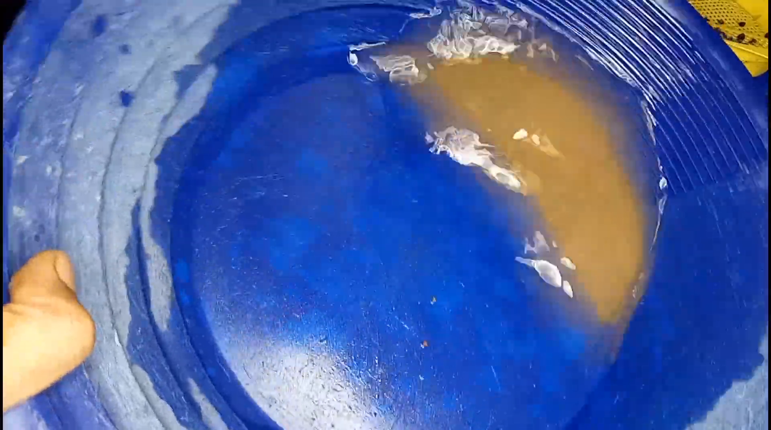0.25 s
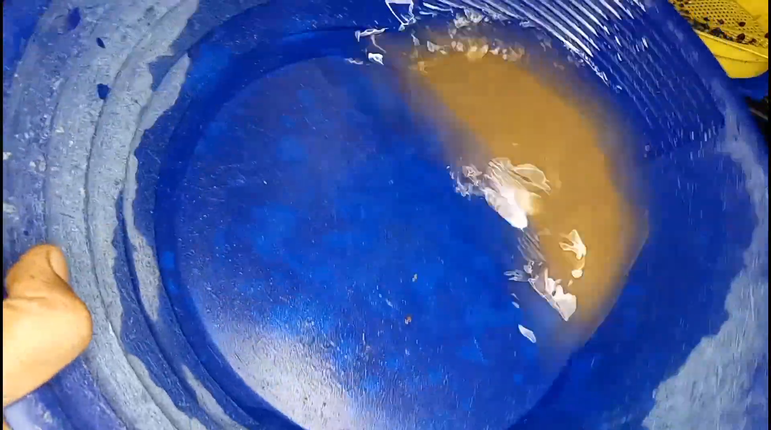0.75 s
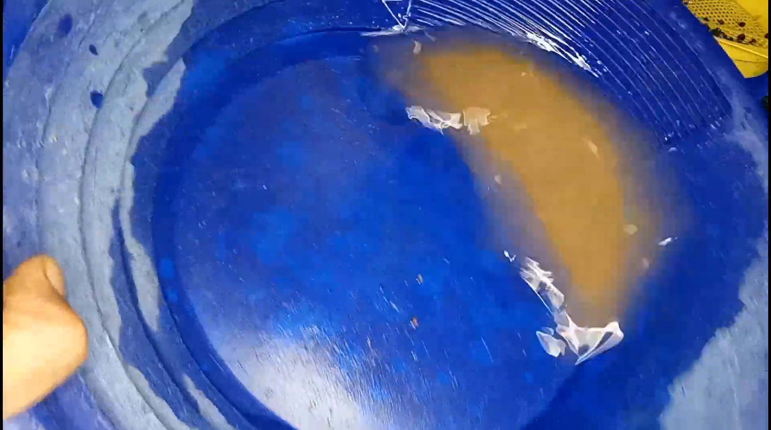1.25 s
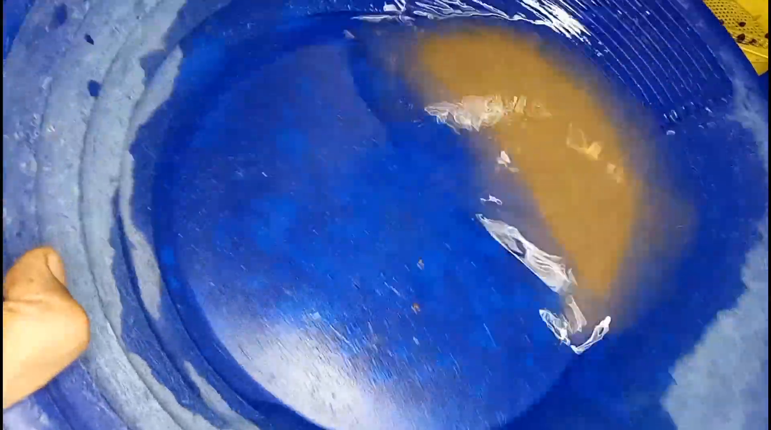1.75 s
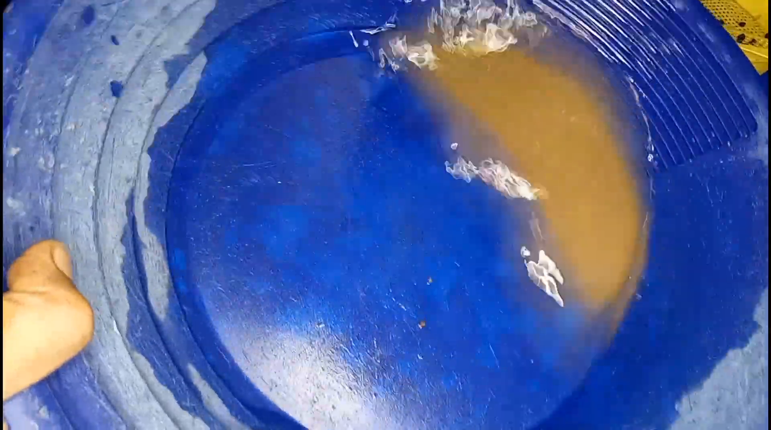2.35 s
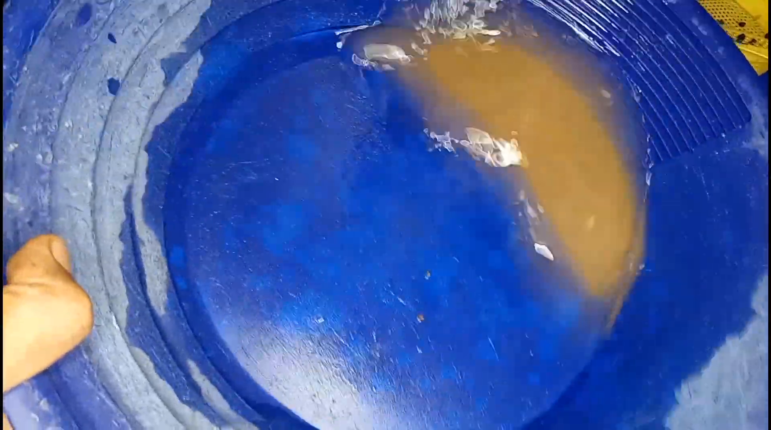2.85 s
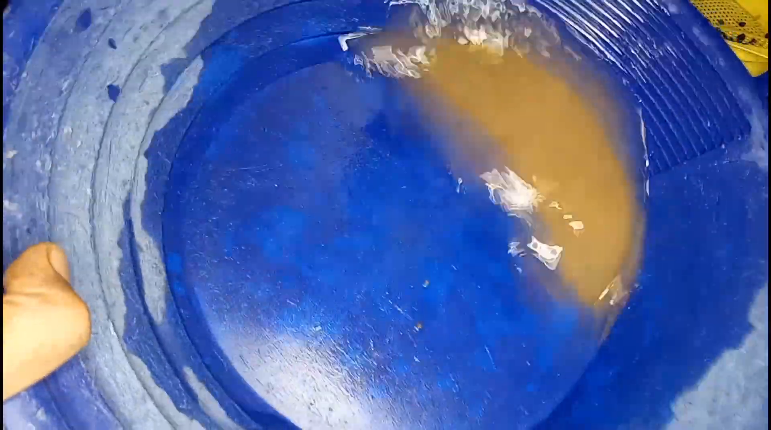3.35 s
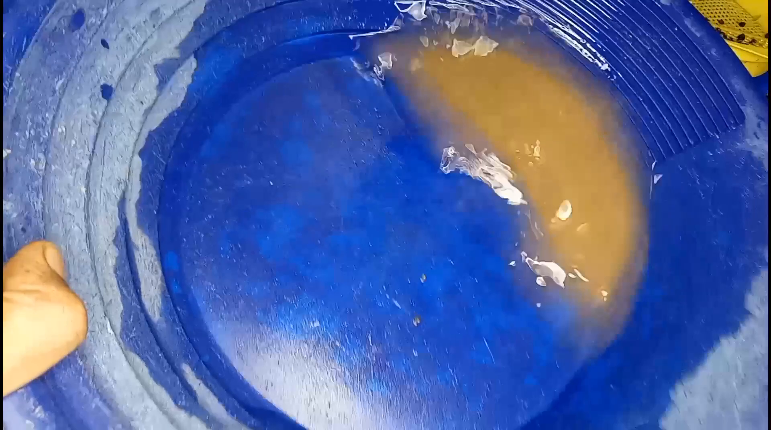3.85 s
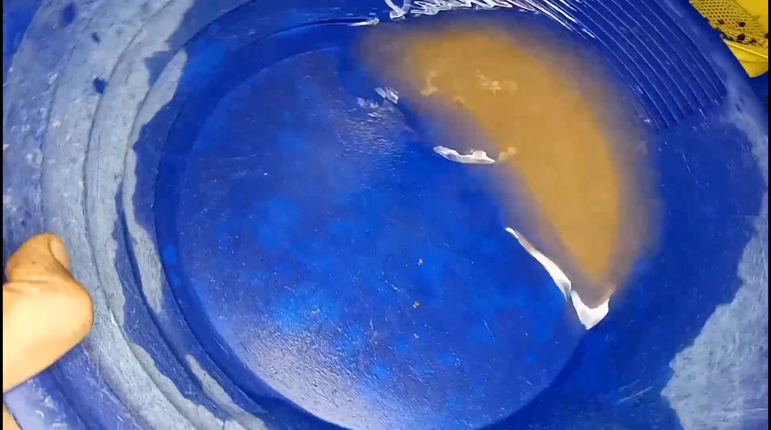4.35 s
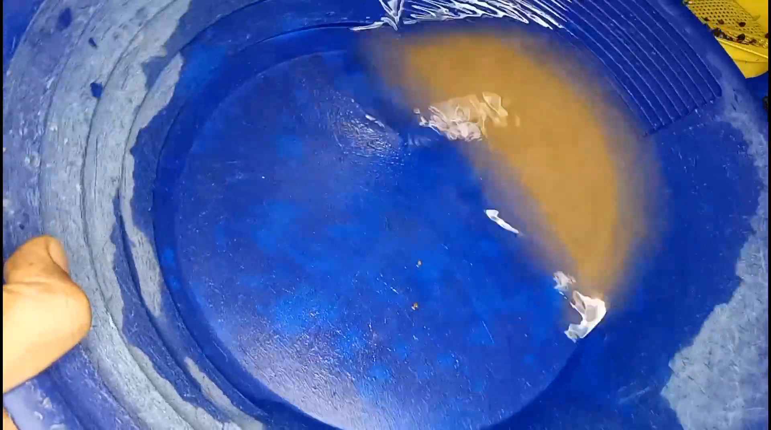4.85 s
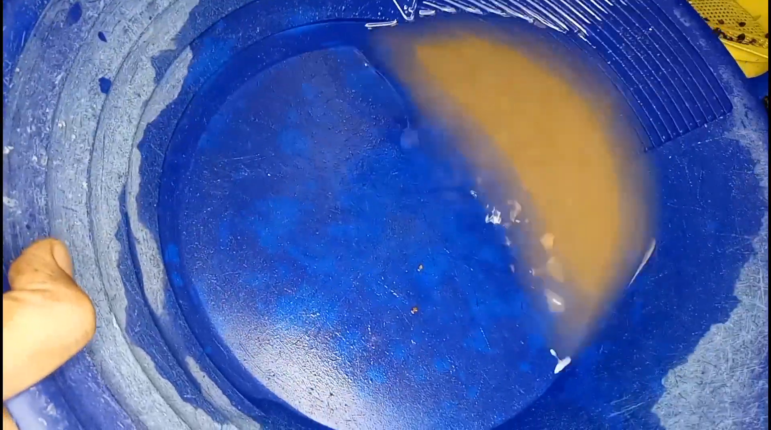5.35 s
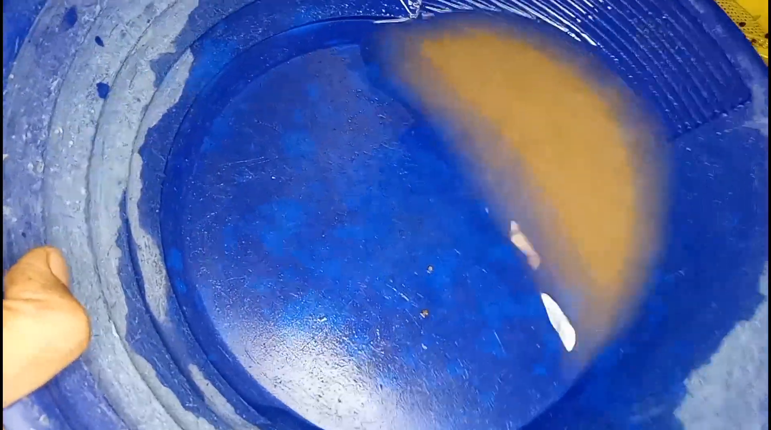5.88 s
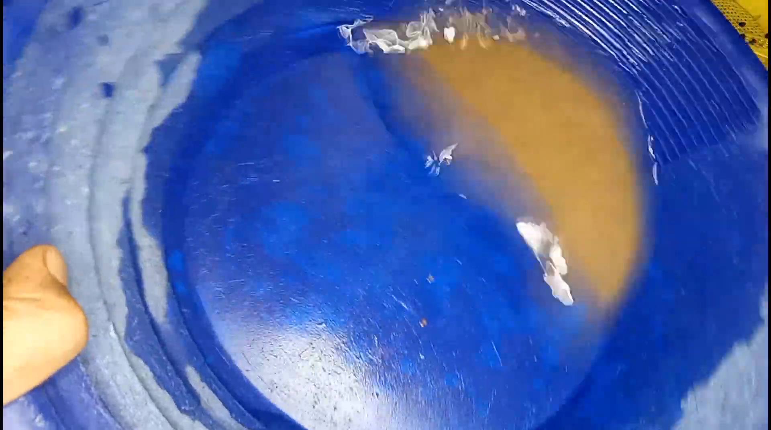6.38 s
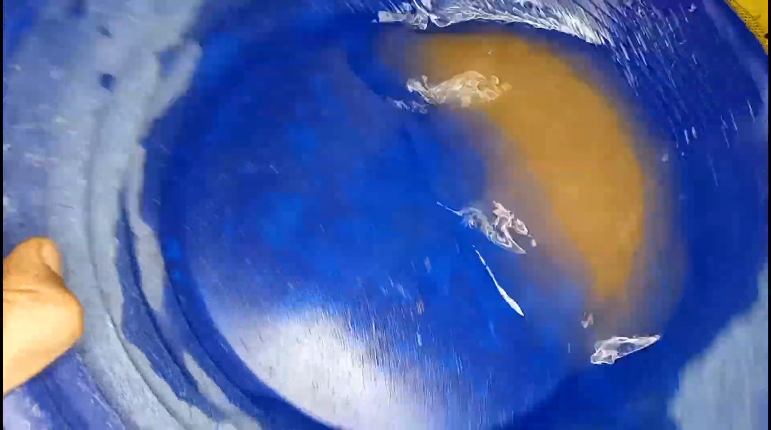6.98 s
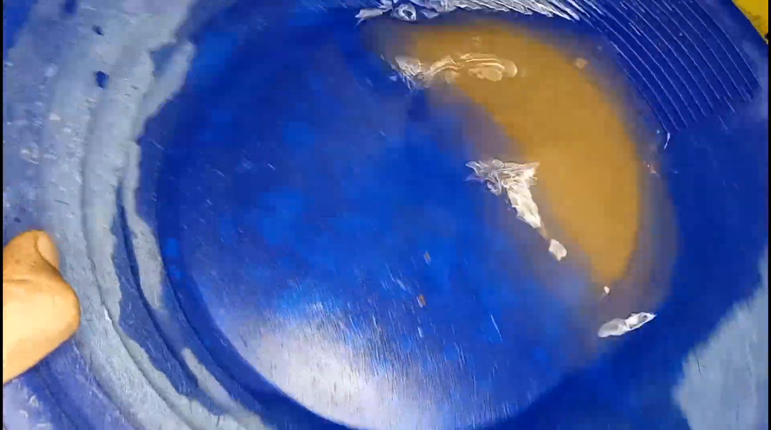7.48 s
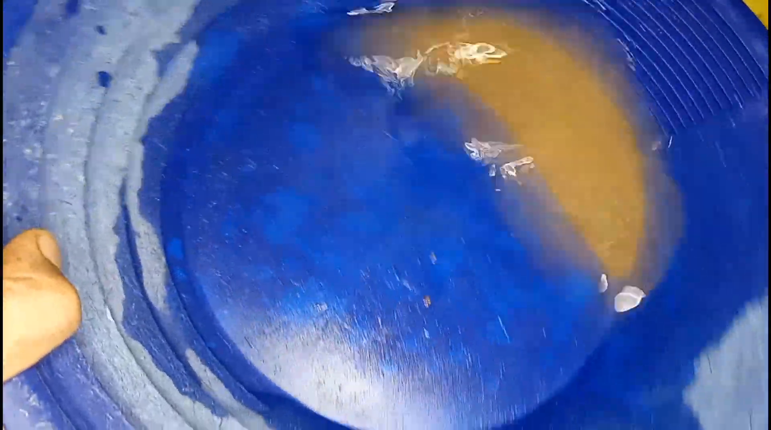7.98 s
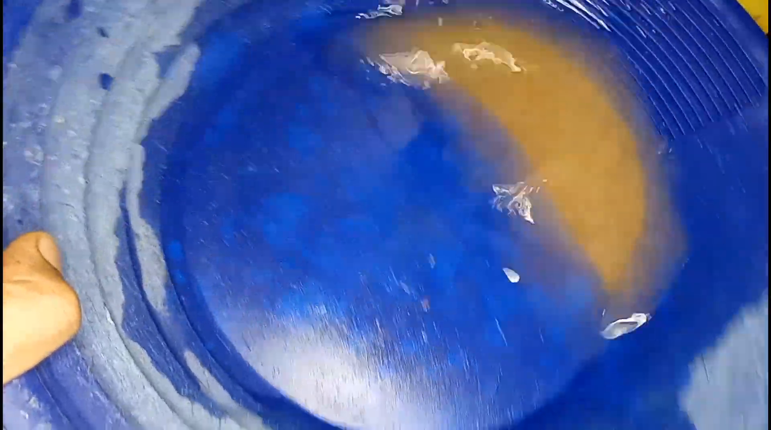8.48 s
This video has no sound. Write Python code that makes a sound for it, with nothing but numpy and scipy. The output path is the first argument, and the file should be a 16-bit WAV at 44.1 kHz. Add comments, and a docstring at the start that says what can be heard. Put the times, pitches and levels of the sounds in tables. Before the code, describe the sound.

Close, gurgling water and gritty sand are rocked around a plastic pan, with hollow taps, small plops and a short lull.

```python
"""A small room, the microphone close to a plastic gold pan in which water and sand are rocked to and fro.
Wavelets gurgle and ring the hollow of the pan; grit and the rocking hand knock and chatter on its shell.
Wet grains crackle, drops snap on the film of water, air pockets plop and sand swishes along the wall.
Past halfway the pan rests: a few tiny bubbles ping over a faint mains hum, then the swirling resumes."""
import sys
import numpy as np
from scipy import signal
from scipy.fft import rfft, irfft
from scipy.io import wavfile
from scipy.ndimage import uniform_filter1d

SR = 44100
rng = np.random.default_rng(int(sys.argv[2]) if len(sys.argv) > 2 else 0)


def int16_out(signal):
    """Quantize to a 16-bit WAV file."""
    q = np.round(np.clip(np.atleast_2d(signal).T, -1, 1) * 32767)
    wavfile.write(sys.argv[1], SR, q.astype(np.int16))


N = 384552
TIME = np.arange(N) / SR

# The swirl as the pan is rocked and rested. Each row: time in seconds, level in dB.
SWIRL_LEVEL = [(0, -46), (.4, -57), (.6, -45), (.85, -61), (.95, -62.5), (1.22, -66.5), (1.6, -52),
               (3.9, -52), (4.15, -56.5), (4.56, -63), (5.15, -54.5), (5.35, -67.5), (6.27, -66),
               (6.5, -53), (7.1, -47), (8.1, -54.5), (8.45, -54.5), (8.72, -48)]
# Shallow water is brighter, deep water duller. Each row: time in seconds, tilt in dB per octave.
DEPTH_TILT = [(0, -0.5), (1.6, -0.5), (3.1, 0), (3.65, 0.5), (5.1, 1.5), (6.2, -0.5), (7.6, -0.5),
              (8.3, 2.5)]
# Single waves running up the wall.
# Each row: start in seconds, level in dB, length in ms, tilt in dB per octave.
SLOSHES = [(0, -42.5, 55, -0.5), (0.791, -43.5, 34, 0.5), (1.508, -53, 120, 3.5), (2.41, -45, 77, -2),
           (2.898, -41.5, 49, -3), (3.124, -48, 23, 4), (3.253, -47, 14, 1), (3.448, -46, 25, -3.5),
           (3.517, -38.5, 20, 0), (3.639, -42.5, 41, -0.5), (3.89, -53.5, 104, -4), (4.069, -51, 40, -1.5),
           (4.439, -45.5, 12, -1.5), (4.649, -58.5, 110, -1), (4.83, -53, 67, 0), (5.06, -45.5, 28, -0.5),
           (5.128, -43.5, 18, -1.5), (5.591, -50.5, 2.9, 1), (6.622, -48, 39, 0), (6.805, -52, 27, 7),
           (6.927, -40.5, 44, 1.5), (7.723, -49, 40, -4), (7.959, -46, 106, -5.5)]
# Long waves circling the wall, making the hollow sing. Each row: start in seconds, level in dB, length in ms.
SWELLS = [(0.62, -48.5, 280), (1.98, -50, 100), (2.93, -48, 55), (6.73, -52, 180), (7.74, -52, 170),
          (8.1, -52, 95)]
# Resonances of that hollow. Each row: centre in Hz, width in Hz, relative level in dB.
HOLLOW_MODES = [(923, 110, 3.5), (1353, 70, -7.5), (1880, 75, -10)]
# Ringing modes: the two lowest are the small room's boom, the rest are the loaded pan's.
# Each row: pitch in Hz, seconds to fall 60 dB, relative level in dB.
RING_MODES = [(125, .25, -11), (207, .16, -10), (330, .03, -17), (440, .03, -14), (588, .07, -11),
              (730, .035, -17), (900, .052, -8), (1150, .04, -16), (1370, .045, -11), (1680, .03, -21),
              (2010, .05, -14), (3400, .015, -16), (3950, .012, -18)]
# Knocks on the shell. Each row: start in seconds, level in dB, thud and crack in dB over the midrange,
# chatter decay time in ms.
KNOCKS = [(0.018, -38, -3, -9, 1.2), (0.2718, -31.5, 8, -13, 2.7), (0.51, -29.5, 1.5, -11, 2.3),
          (0.5243, -34, -7.5, -18, 2.9), (0.653, -37, -2, 1, 7.4), (0.7379, -37.5, -9, -13, 1.7),
          (0.7565, -28, 2.5, -16, 3.1), (0.801, -38, -6, -19, 2.1), (0.831, -40.5, -2, -11.5, 3.2),
          (1.322, -50, -8, 0, 4.2), (1.7321, -41, -12, -8.5, 1.6), (1.7439, -38, -7, -11, 2.4),
          (1.8615, -27.5, 3, -16, 1.1), (1.874, -27.5, -16.5, -11, 2.3), (1.9002, -28, -1, -5.5, 7.2),
          (2.002, -38.5, -13, -18, 3.8), (2.0886, -27, 3.5, -16, 5), (2.2188, -38.5, -21, -7, 1.1),
          (2.3393, -24.5, -1.5, -11.5, 3.8), (2.3762, -35, 5.5, -13, 3), (2.4127, -31.5, -9, -9.5, 0.37),
          (2.441, -37, 3, -8, 4.6), (2.4762, -37.5, -5.5, -15, 7.7), (2.542, -42.5, -1.5, 5.5, 10),
          (2.7338, -41.5, -13.5, -11, 3.9), (2.8483, -27, 1.5, -6, 4.1), (2.868, -36.5, -6, -10, 4),
          (2.9056, -35, 0, -2.5, 1.8), (3.2068, -32.5, -50, -12.5, 1.3), (3.3285, -21.5, -1.5, -11, 0.76),
          (3.3472, -33, -29.5, 2.5, 9.1), (3.6755, -37, 6.5, 8, 5.1), (3.9082, -32, 3, -19, 0.12),
          (6.3226, -45, -8, -12.5, 2.7), (6.8168, -37.5, -14, -10, 1.4), (6.923, -32, 3.5, -10, 0.17),
          (6.974, -37, 1, -9, 2.4), (6.999, -36.5, -5.5, -39, 15), (7.108, -37, -7, -10, 2.9),
          (7.12, -32.5, -15.5, -41, 2.2), (7.2007, -29.5, -1.5, -5.5, 2.6), (7.34, -31, -10, -4.5, 2.1),
          (7.394, -31.5, -2.5, -13.5, 4.1), (7.408, -32, -8, -15.5, 0.77), (7.4298, -28, 1.5, -16, 0.1),
          (7.6787, -29.5, 2, -21, 1.5), (7.9217, -34.5, 3, -28, 2.6), (7.939, -28, -0.5, -4, 0.038),
          (7.989, -43, 7, -4, 2), (8.7121, -27, -4, -1, 0.085)]
# Scrapes of wet grit. Each row: start in seconds, level in dB.
SCRAPES = [(0.049, -41.5), (0.17, -54), (0.995, -49), (1.511, -48.5), (1.744, -44), (1.895, -46),
           (2.08, -36), (2.868, -44), (3.794, -39.5), (3.902, -36), (4.074, -45), (4.194, -55.5),
           (4.443, -55), (4.668, -51), (4.834, -57.5), (5.136, -50.5), (6.578, -53.5), (6.815, -43),
           (7.108, -42), (7.406, -38), (7.452, -38.5), (7.798, -47.5), (8.068, -47.5), (8.589, -47.5),
           (8.68, -45)]
# Drops on the thin film of water.
# Each row: start in seconds, level in dB, pitch in Hz, crack in dB over the tone.
SNAPS = [(0.562, -27.5, 834, -8), (5.1009, -43, 1610, -15), (8.0253, -31, 1140, -11),
         (8.4674, -26.5, 990, -5)]
# Clusters of tiny bubbles in calming water. Each row: start in seconds, pitch in Hz, level in dB.
PINGS = [(1.24, 3000, -60), (4.75, 2020, -48), (5.49, 2450, -55), (5.69, 3900, -58), (5.76, 4300, -54),
         (5.995, 4150, -58), (6.13, 5450, -61)]
# Air pockets that a wave closes over. Each row: start in seconds, pitch in Hz, level in dB.
PLOPS = [(1.475, 1490, -46), (1.612, 413, -41.5), (2.594, 380, -44.5), (2.829, 1364, -30.5),
         (3.629, 454, -42), (3.648, 503, -42.5), (3.942, 615, -44), (4.629, 1580, -45), (6.187, 351, -54.5)]
# Sand sliding over the riffles. Each row: time in seconds, level in dB.
SLIDE_LEVEL = [(3.62, -84), (3.675, -73), (3.775, -88), (3.8, -43), (3.875, -64), (3.91, -45), (3.99, -90)]
# Mains hum. Each row: frequency in Hz, level in dB before the hum's overall gain.
HUM_PARTIALS = [(120, -78), (660, -77), (840, -79)]
# Tone colours of water, shell, grit, sand and room air; the narrow peaks near 9.5 and 15 kHz are the
# microphone's own sizzle. Each row: frequency in Hz, relative gain in dB.
WATER_COLOUR = [(60, -8.5), (200, -3), (550, -5.5), (750, -1.5), (910, 3), (1120, -1), (1370, -0.5),
                (2000, -1), (2500, -5), (3600, -7.5), (6200, -6), (8500, -24.5), (15000, -23.5)]
SHELL_AT_MIC = [(45, -67), (110, -16.5), (200, -10.5), (330, -0.5), (600, -5.5), (1000, -1.5), (1500, -6),
                (2400, -4.5), (3600, 2.5), (6300, 2.5), (8300, -15.5), (13000, -17.5), (15000, -4),
                (17000, -101)]
GRIT_AT_MIC = [(500, -8.5), (2000, -5.5), (6000, 3), (8000, -4), (9500, -3.5), (11500, -2), (13700, -7),
               (14900, 5), (17000, -8.5)]
SAND_AT_MIC = [(3000, -20), (6500, -3), (8700, -11), (9450, 7), (10200, -13), (13700, -16), (14500, 1),
               (15300, -3), (16300, -25)]
AIR_COLOUR = [(30, -16), (62, -2), (90, -5), (120, 0), (160, -9), (850, -4), (1800, -15), (4000, -16),
              (9000, -31), (15000, -36)]

SLOSH_ATTACK_S, SLOSH_T60_S = 0.011, 0.082
LEFT_RIGHT = np.array([[1], [-1]])
ONSET = SR // 100  # a hit's level is set over its first 10 ms


def undb(db):
    """Decibels to gain."""
    return 10 ** (np.asarray(db) / 20)


def unit(x):
    """Scale to rms 1."""
    return x / np.sqrt(np.mean(x ** 2))


def curve(rows):
    """Join (seconds, value) rows by straight lines."""
    return np.interp(TIME, *np.transpose(rows))


def add(track, s, sound):
    """Mix a sound into a track at s seconds."""
    start = int(np.clip(s * SR, 0, N - 1))
    track[..., start:start + sound.shape[-1]] += sound[..., :N - start]


def colour(points, hz):
    """Gain of a (Hz, dB) spectrum at the given frequencies."""
    corners_hz, db = np.transpose(points)
    return undb(np.interp(np.log(hz + 1), np.log(corners_hz), db))


def tint(x, points):
    """Filter a sound by a (Hz, dB) spectrum."""
    return irfft(rfft(x) * colour(points, np.fft.rfftfreq(N, 1 / SR)), N)


def low_cut(x, hz):
    """Roll off the bass below hz."""
    return signal.sosfilt(signal.butter(2, hz, "highpass", fs=SR, output="sos"), x)


def causal(gain):
    """Minimum-phase spectrum with this gain: sharp attack, short tail."""
    cepstrum = irfft(np.log(gain))
    half = len(cepstrum) // 2
    cepstrum[1:half] *= 2
    cepstrum[half + 1:] = 0
    return np.exp(rfft(cepstrum))


def fade(t, t60):
    """Decay by 60 dB in t60 seconds."""
    return np.exp(-np.log(1000) * t / t60)


def through(x, response):
    """Pass a sound through an impulse response."""
    return signal.fftconvolve(np.atleast_2d(x), response, axes=1)[:, :N]


def wide(size, split_hz):
    """Stereo noise, alike in the bass and unrelated in the treble."""
    mid, side = rng.standard_normal((2, size))
    hz = np.fft.rfftfreq(size, 1 / SR)
    apart = .5 * hz ** 3 / (hz ** 3 + split_hz ** 3)
    return irfft(rfft(mid) * np.sqrt(1 - apart) + rfft(side) * np.sqrt(apart) * LEFT_RIGHT, size)


def patter(per_second, spread_db):
    """Random clicks, many small and a few large."""
    lands = rng.random(N) < per_second / SR
    size = np.minimum(rng.exponential(size=N), 4)
    return lands * rng.choice([-1, 1], N) * undb(spread_db * size)


def pan_and_room_ring(t, scatter_db, detune):
    """The pan rings and the room booms; each contact weights and detunes the modes afresh."""
    hz, t60, db = np.transpose(RING_MODES)[:, :, None]
    weight, shift = rng.standard_normal((2, len(RING_MODES), 1))
    gain = undb(db + scatter_db * weight) * np.sqrt(2 / SR * np.log(1000) / t60)
    return np.sum(gain * fade(t, t60) * np.cos(2 * np.pi * hz * (1 + detune * shift) * t), axis=0)


def bubble(hz, cycles, glide):
    """A trapped bubble rings down; glide lifts its pitch as it nears the surface."""
    t = np.arange(int(cycles / hz * SR) + 2) / SR
    return fade(t, t[-1]) * np.sin(2 * np.pi * hz * t * (1 + glide * t / t[-1]))


def wavelets(rate_hz, depth_db, step_hz=200):
    """Gain that swells and sinks at random as wavelets arrive."""
    times = np.arange(0, N / SR, 1 / step_hz)
    memory = np.exp(-rate_hz * 2 * np.pi / step_hz)
    walk = unit(signal.lfilter([1], [1, -memory], rng.standard_normal(len(times))))
    return unit(undb(depth_db * np.clip(np.interp(TIME, times, walk), -2, 2)))


def surge(s, db, hold_s, t60=SLOSH_T60_S):
    """Power of one wave that rises quickly, holds, then drains away."""
    height, t = np.zeros(N), np.arange(SR // 2) / SR
    add(height, s, np.minimum(t / SLOSH_ATTACK_S, 1) * fade(np.maximum(t - hold_s, 0), t60))
    return (undb(db) * height) ** 2


def waves(still_db=-72, wake_db=-17, wake_t60=0.15, wake_tilt=1):
    """Swirl, sloshes and each knock's wake add up to the water's gain and its tilt in dB per octave."""
    swirl = np.maximum(undb(curve(SWIRL_LEVEL)) - undb(still_db), 0)
    power = (swirl * wavelets(rate_hz=40, depth_db=4.8)) ** 2 + 1e-12
    tilt = np.zeros(N)
    for s, db, ms, slosh_tilt in SLOSHES:
        slosh = surge(s, db, ms / 1000)
        power += slosh
        tilt += slosh_tilt * slosh
    for s, db, *_ in KNOCKS:
        wake = surge(s, db + wake_db, SLOSH_ATTACK_S, wake_t60)
        power += wake
        tilt += wake_tilt * wake
    return np.sqrt(power), curve(DEPTH_TILT) + tilt / power


def wall_pockets(x, tilt, depth_db=4):
    """Pockets between wavelet and wall open and close, each a brief resonance; tilt sets brightness."""
    hz, times, spectra = signal.stft(x, SR, nperseg=512)
    pockets = rng.standard_normal(spectra.shape[1:])
    for _ in range(2):
        pockets = uniform_filter1d(uniform_filter1d(pockets, size=3, axis=0), size=4, axis=1)
    resonances = unit(undb(depth_db * np.clip(unit(pockets), -2, 2)))
    octaves = np.log2(np.clip(hz, 200, 3000) / 900)
    brightness = undb(np.outer(octaves, np.interp(times, TIME, tilt)))
    shaped = signal.istft(spectra * resonances * brightness, SR)[1][:, :N]
    return low_cut(shaped, 130)  # the water's sound stays clear of the deep bass


def singing_hollow(flow, ring_db=-8):
    """Uneven laps keep the hollow of the pan ringing; its pitch wanders as the depth changes."""
    hz = np.fft.rfftfreq(N, 1 / SR)
    gain = sum(undb(db) / (1 + (2 * (hz - centre) / width) ** 2) for centre, width, db in HOLLOW_MODES)
    ring = irfft(rfft(wide(N, split_hz=1300)) * gain, N)
    speed = wavelets(rate_hz=8, depth_db=.25)
    position = np.cumsum(speed / np.mean(speed))
    wandering = unit(np.array([np.interp(position, np.arange(N), channel) for channel in ring]))
    power = (undb(ring_db) * flow) ** 2 + sum(surge(s, db, ms / 1000) for s, db, ms in SWELLS)
    return np.sqrt(power) * wavelets(rate_hz=25, depth_db=4) * wandering


def water(ring_db=1, bubble_count=3800, cycles_at_1khz=19, lag_s=.00013):
    """Wavelets lap on the pan and fold in bubbles; the hollow of the pan sings along."""
    t = np.arange(SR // 10) / SR
    drops = patter(per_second=4000, spread_db=3) + .5 * wide(N, split_hz=700)
    laps = drops + undb(ring_db) * through(drops, pan_and_room_ring(t, scatter_db=-4, detune=0)[None])
    bubbles = np.zeros((2, N))
    for when, pitch, faintness, life, place in rng.random((bubble_count, 5)):
        hz = 280 * 20 ** pitch
        cycles = cycles_at_1khz * (.5 + life) * np.sqrt(hz / 1000)  # small bubbles ring more cycles
        ring = (faintness + .25) ** -.45 * bubble(hz, cycles, glide=.1)
        for channel, side in zip(bubbles, (2 * place - 1, 1 - 2 * place)):
            add(channel, when * N / SR + lag_s * side, ring * (1 - .25 * side))
    lapping = unit(tint(laps, WATER_COLOUR)) * wavelets(rate_hz=70, depth_db=3.5)
    gurgle = unit(tint(bubbles, WATER_COLOUR))
    flow, tilt = waves()
    return flow * wall_pockets((lapping + gurgle) / np.sqrt(2), tilt) + singing_hollow(flow)


def stirred(tries, calm_db=-64):
    """Random moments when the swirl moves grit. Each row: time in seconds, swirl in dB, luck 0 to 1."""
    when, luck = rng.random((tries, 2)).T * np.array([[N / SR], [1]])
    db = np.interp(when, *np.transpose(SWIRL_LEVEL))
    return np.transpose([when, db, luck])[db > calm_db]


def contact(t, chatter_s, lead_s, creep=0.48):
    """A contact creeps, lets go with one impact, then chatters; brief contacts hardly creep."""
    since = t - lead_s
    creeping = creep * (t / lead_s) * min(2 * chatter_s / lead_s, 1)
    grip = np.where(since < 0, creeping, np.exp(-np.abs(since) / chatter_s))
    force = grip * rng.standard_normal(len(t)) / np.sqrt(SR / 1000)
    force[int(lead_s * SR)] += 1
    return force


def squeezed_water(t, thud_db, centre_hz=720, db_per_octave=20, t60=0.012):
    """Water squeezed by a knock rings for a few cycles; the softer the contact, the lower the note."""
    hz = centre_hz * 2 ** np.clip(-thud_db / db_per_octave, -1, 1)
    return unit(fade(t, t60) * np.cos(2 * np.pi * hz * t)) / np.sqrt(len(t))


def taps(over_swirl_db=-0.5, spread_db=2.5, lightest_thud_db=-24, crack_db=-0.5, chatter_ms=1):
    """Swirled grit taps the shell, the lighter the less thud; rows as in KNOCKS."""
    return [(s, db + over_swirl_db + spread_db * (1 - 2 * light),
             lightest_thud_db * light, crack_db, chatter_ms) for s, db, light in stirred(tries=40)]


def knocks(ring_db=-6, squeeze_db=-8, rattle_db=-5.5, thud_hz=600, crack_hz=2200,
           lead_s=.008, bend_s=0.000673, lag_s=.00007, size=8192):
    """Each knock flexes the shell: soft contacts thud, hard ones crack, and the wall rattles briefly."""
    out, t, hz = np.zeros((2, N)), np.arange(size) / SR, np.fft.rfftfreq(size, 1 / SR)
    low = 1 / (1 + (hz / thud_hz) ** 6)
    high = 1 - 1 / (1 + (hz / crack_hz) ** 6)
    bands = np.array([low, np.abs(1 - low - high), high])
    tone = colour(SHELL_AT_MIC, hz)
    # bending waves are slower in the bass, so a knock sweeps downward
    bending = np.exp(-4j * np.pi * bend_s * np.sqrt(1000 * hz))
    for s, db, thud_db, crack_db, chatter_ms in KNOCKS + taps():
        force = rfft(contact(t, chatter_ms / 1000, lead_s))
        # waves bounce off the rim, densely at first, then die away
        rattle = wide(size, split_hz=1000) * (5 * fade(t, t60=.011) + fade(t, t60=.092))
        ring = undb(ring_db) * pan_and_room_ring(t, scatter_db=2, detune=.02)
        ring += undb(squeeze_db) * squeezed_water(t, thud_db)
        body = force * (.5 + rfft(ring + undb(rattle_db) * unit(rattle) / np.sqrt(size)))
        # the hardness of the contact shares the energy between the three bands
        energy = bands @ np.mean(np.abs(body * tone) ** 2, axis=0)
        hardness = (undb([thud_db, 0, crack_db]) / np.sqrt(energy)) @ bands
        # knocks come from all round the pan, so either channel may lead
        side = rng.uniform(-1.014, 1) * LEFT_RIGHT
        delay = np.exp(-2j * np.pi * hz * lag_s * side)
        hit = irfft(body * causal(tone * hardness + 1e-9) * bending * delay)
        attack = hit[:, int(lead_s * SR):][:, :ONSET]
        add(out, s - lead_s, hit * undb(db - side / 2) / np.std(attack))
    return out


def grit(scrape_t60=0.081, tick_t60=0.037, drag_db=-16.5, fine_db=-7, spread_db=11, size=4096):
    """Wet grains catch and let go in bursts of clicks; sloshes drag some, the swirl stirs finer ones."""
    out, t, hz = np.zeros((2, N)), np.arange(size) / SR, np.fft.rfftfreq(size, 1 / SR)
    tone = causal(colour(GRIT_AT_MIC, hz))
    scraped = [(s, db, scrape_t60) for s, db in SCRAPES]
    dragged = [(s + SLOSH_ATTACK_S, db + drag_db, scrape_t60) for s, db, *_ in SLOSHES]
    fine = [(s, db + fine_db + spread_db * (luck ** 2 - 1), tick_t60)
            for s, db, luck in stirred(tries=140)]
    for s, db, t60 in scraped + dragged + fine:
        clicks = rng.standard_normal(size) ** 3 * (fade(t, t60) + 2 * fade(t, t60 / 10))
        paths = wide(size, split_hz=1500) * fade(t, t60=.004)
        burst = irfft(rfft(clicks) * rfft(paths) * tone)
        add(out, s, burst * undb(db) / np.std(burst[:, :ONSET]))
    return out


def resonance(hz, centre_hz, octaves):
    """Gain of a broad peak."""
    return 1 / (1 + np.abs(np.log2((hz + 1) / centre_hz) / octaves) ** 3)


def snaps(crack_hz=3600, ring_db=-1, echo_db=-4, echo_t60=.012, tail_db=-9, tail_t60=0.095, size=8192):
    """A drop lands with a heavily damped tone and a crack, then pan and room ring and the wall echoes."""
    out, t, hz = np.zeros((2, N)), np.arange(size) / SR, np.fft.rfftfreq(size, 1 / SR)
    for s, db, pitch_hz, crack_db in SNAPS:
        echo, tail = (unit(wide(size, split_hz=1200) * fade(t, t60)) / np.sqrt(size)
                      for t60 in (echo_t60, tail_t60))
        ring = pan_and_room_ring(t, scatter_db=2, detune=.01)
        paths = 1 + rfft(undb(ring_db) * ring + undb(echo_db) * echo + undb(tail_db) * tail)
        tone = resonance(hz, pitch_hz, octaves=0.64)
        crack = undb(crack_db) * resonance(hz, crack_hz, octaves=0.54)
        hit = irfft(paths * causal(tone + crack))
        add(out, s, hit * undb(db) / np.std(hit[:, :ONSET]))
    return out


def pings(count=12, ring_s=.03, scatter_s=.025):
    """Small clusters of like-sized bubbles burst in the calm water."""
    out = np.zeros((2, N))
    for s, hz, db in PINGS:
        for late, detune, place in rng.uniform(-1, 1, (count, 3)):
            ring = bubble(hz * (1 + .1 * detune), cycles=hz * ring_s, glide=0)
            gain = undb(db) * (1 + .5 * place * LEFT_RIGHT) / np.sqrt(count)
            add(out, s + scatter_s * (1 + late), gain * ring)
    return out


def plops(spread_octaves=0.29, gap_cycles=2.4, falloff=0.68, count=6):
    """An air pocket breaks into a quick run of ever weaker bubbles; large pockets glug low and slowly."""
    out = np.zeros((2, N))
    for s, hz, db in PLOPS:
        run = np.zeros(SR // 10)
        for k, (late, pitch) in enumerate(rng.random((count, 2))):
            ring = bubble(hz * 2 ** (spread_octaves * (2 * pitch - 1)), cycles=14, glide=0.088)
            add(run, (k + late / 2) * gap_cycles / hz, falloff ** k * ring)
        run = low_cut(run, hz / 2)
        add(out, s, run * undb(db) / np.std(run[:ONSET]))
    return out


def sand():
    """A short, dense swish of sand sliding along the wall in uneven spurts."""
    grains = np.array([patter(per_second=7000, spread_db=4) for _ in range(2)])
    spurts = wavelets(rate_hz=40, depth_db=2.5)
    sliding = (TIME > SLIDE_LEVEL[0][0]) & (TIME < SLIDE_LEVEL[-1][0])
    return unit(tint(grains, SAND_AT_MIC)) * spurts * undb(curve(SLIDE_LEVEL)) * sliding


def room(x, wet_db=-11, crossover_hz=4000, low_t60=0.1, high_t60=0.11, build_s=0.017):
    """The near walls add a short tail, well under the direct sound at the microphone."""
    t = np.arange(SR // 2) / SR
    echoes = wide(len(t), split_hz=900)
    lows = signal.sosfilt(signal.butter(1, crossover_hz, fs=SR, output="sos"), echoes)
    tail = lows * fade(t, low_t60) + (echoes - lows) * fade(t, high_t60)
    tail *= 1 - np.exp(-(t / build_s) ** 2)
    return x + through(x, undb(wet_db) * unit(tail) / np.sqrt(len(t)))


def room_tone(air_db=-71, hum_gain_db=-1):
    """Still air and a faint, steady mains hum, heard when the pan rests."""
    hum = sum(undb(db) * np.sin(2 * np.pi * (hz * TIME + rng.random())) for hz, db in HUM_PARTIALS)
    air = unit(tint(wide(N, split_hz=140), AIR_COLOUR))
    return undb(air_db) * air + undb(hum_gain_db) * hum


def scene(right_db=.55):
    """The pan in its room, close to the microphone and a little to the right."""
    pan = knocks() + snaps() + grit() + water() + plops() + sand() + pings()
    return room(pan) * undb(-right_db * LEFT_RIGHT) + room_tone()


def record(dry):
    """The recorder cuts the highest treble steeply."""
    top_hz = 15900
    return signal.sosfilt(signal.ellip(8, .2, 70, top_hz, fs=SR, output="sos"), dry)


dry = scene()
out = record(dry)
int16_out(out)
```